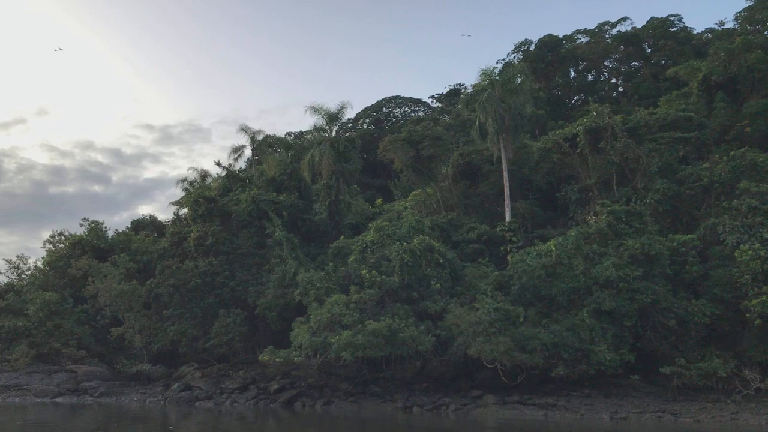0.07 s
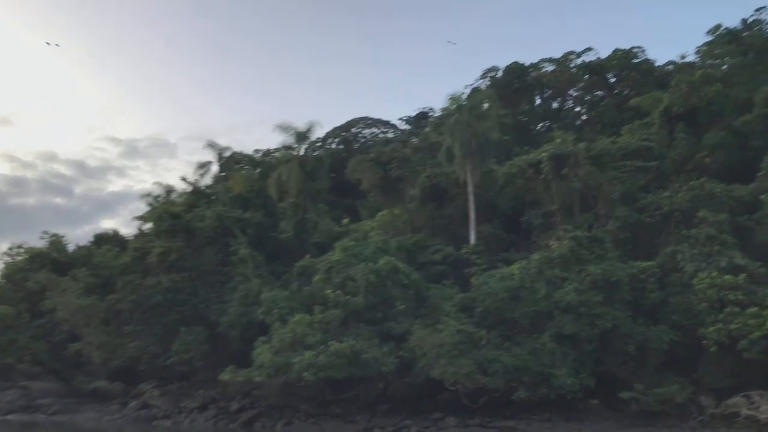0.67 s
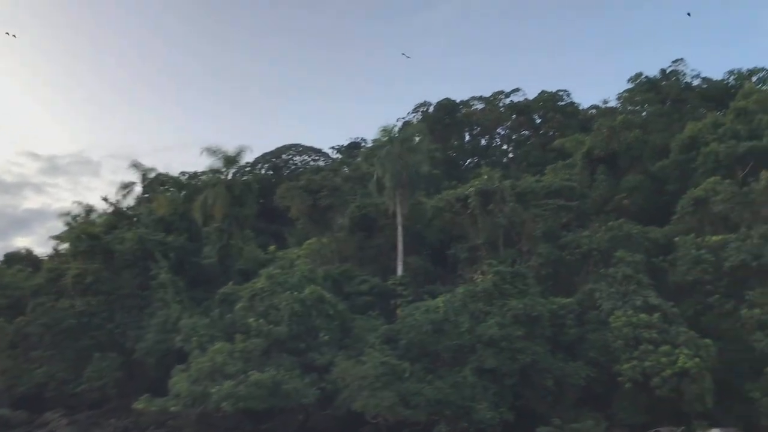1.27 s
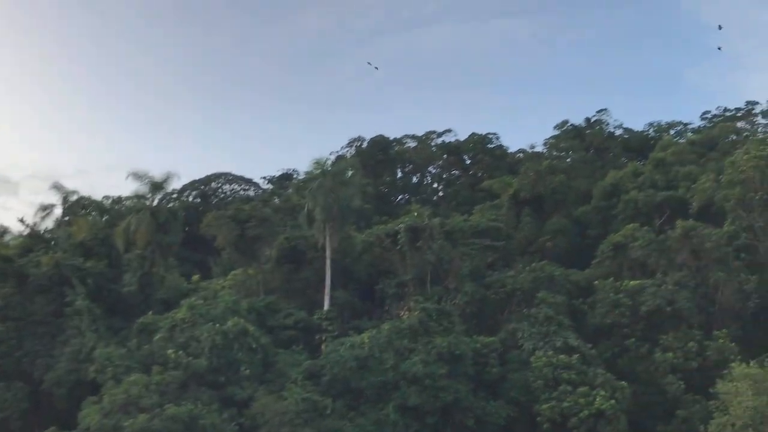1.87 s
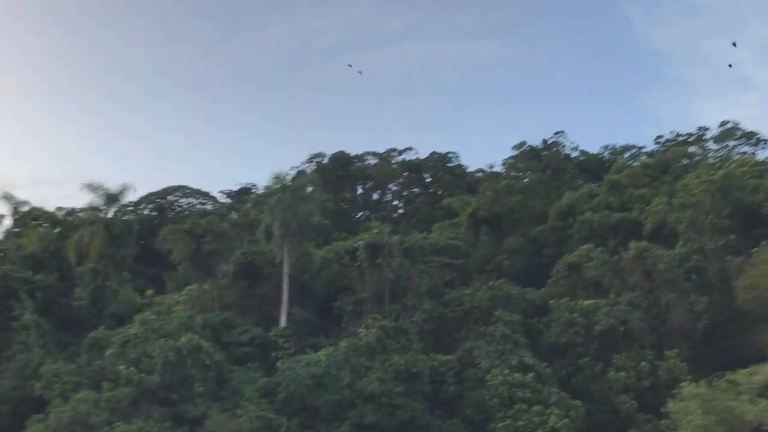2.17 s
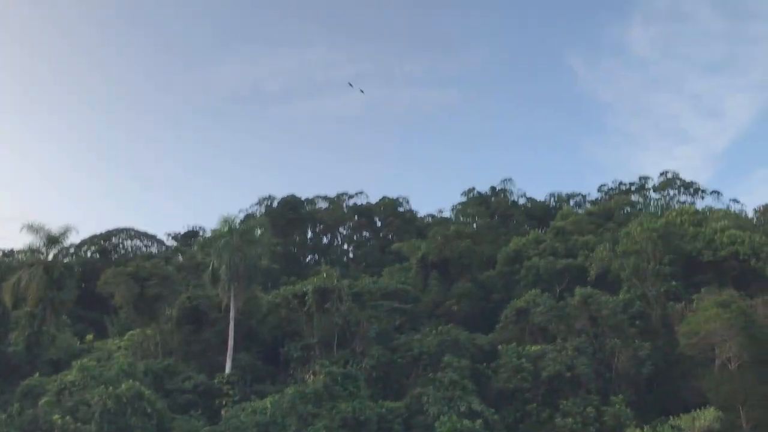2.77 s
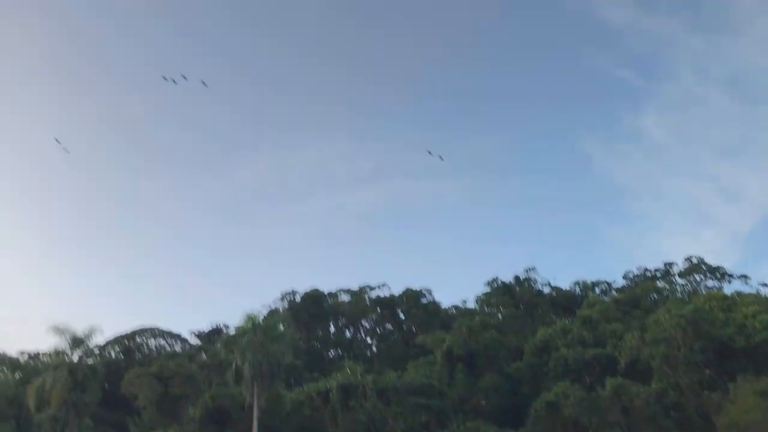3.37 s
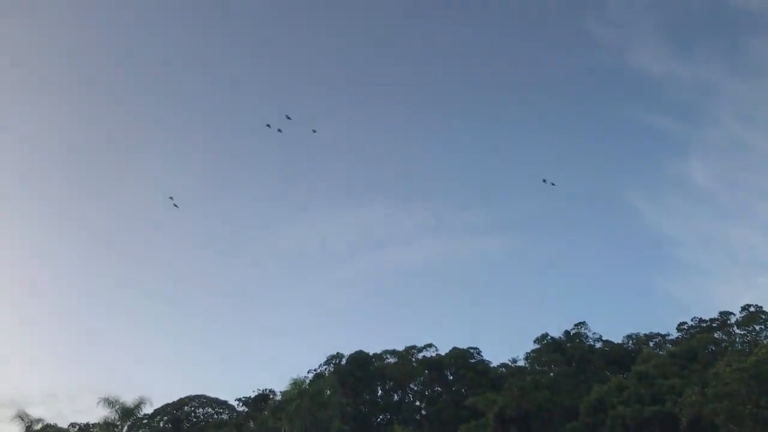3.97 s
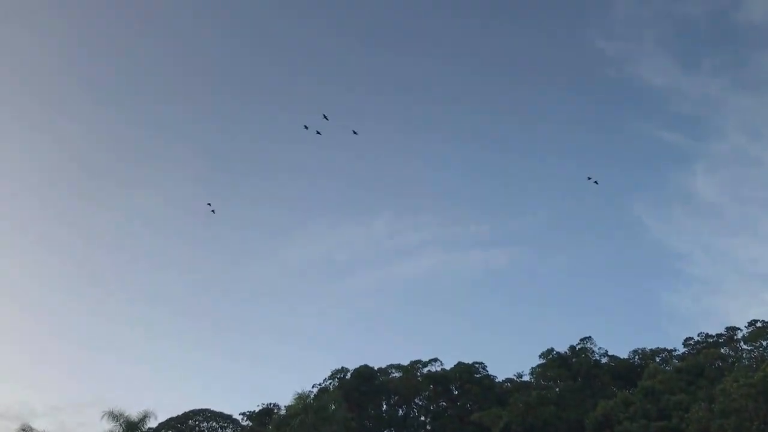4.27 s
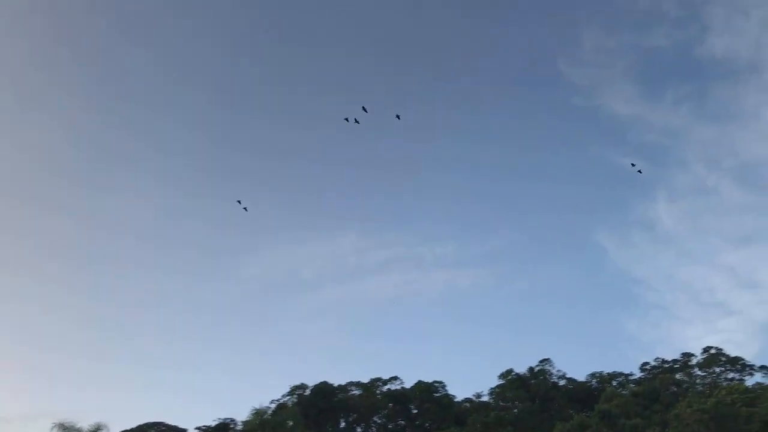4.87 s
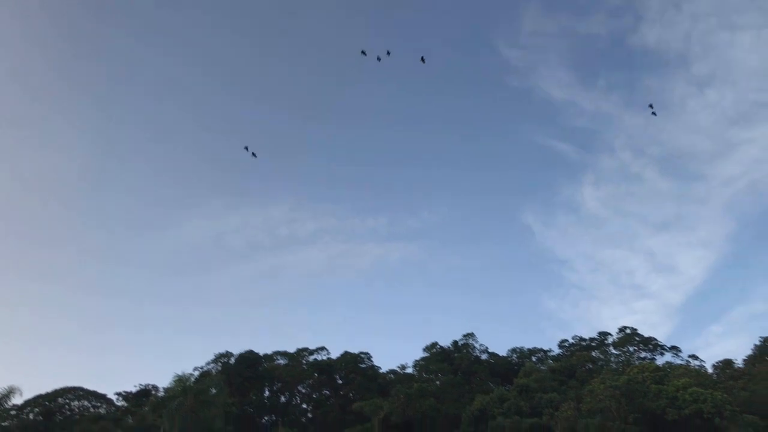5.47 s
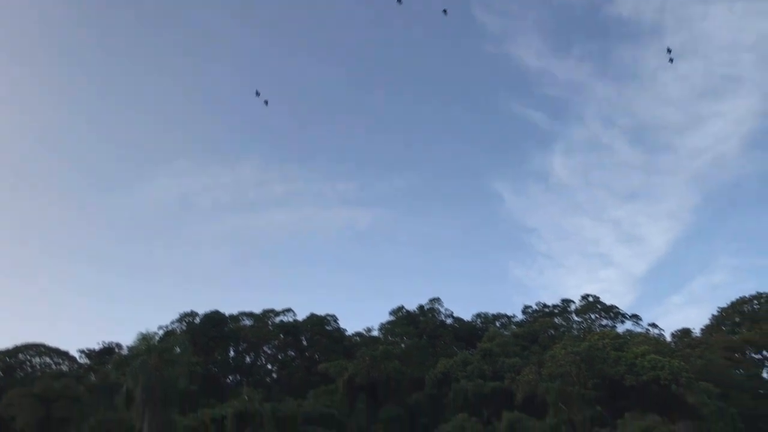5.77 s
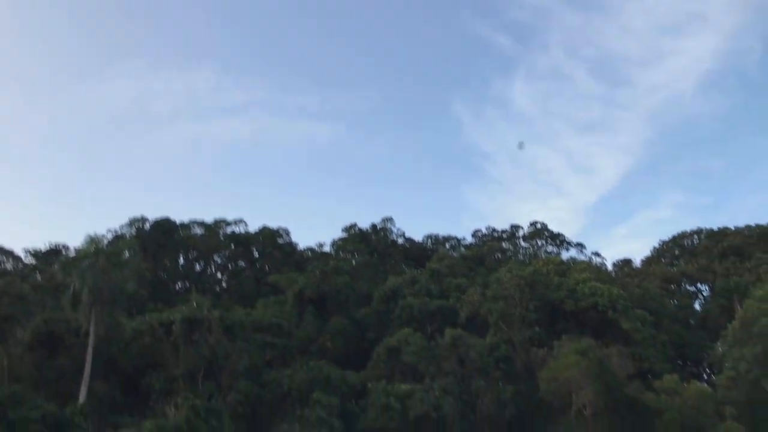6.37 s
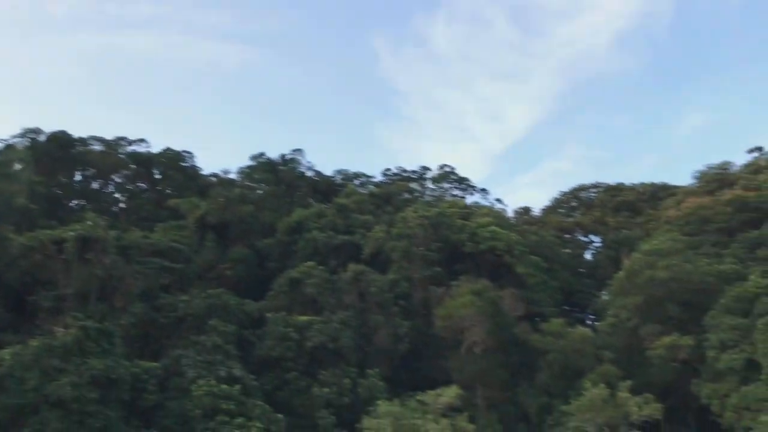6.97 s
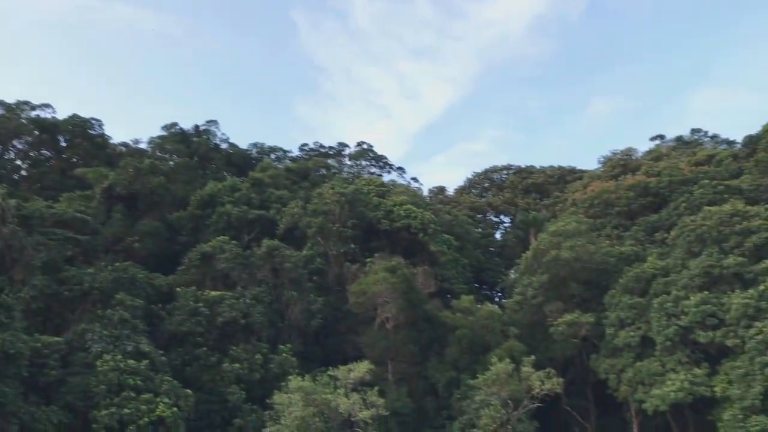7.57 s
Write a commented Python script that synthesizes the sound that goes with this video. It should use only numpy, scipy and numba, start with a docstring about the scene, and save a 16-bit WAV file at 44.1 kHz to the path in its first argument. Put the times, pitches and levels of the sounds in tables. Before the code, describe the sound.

Parrots fly overhead with short screeches, yelps and rattling squawks, over a distant chattering flock and a faint engine hum.

```python
"""A forested shore, where pairs of parrots fly over with shrill held screeches, hoarse rising yelps
and harsh rattling squawks. A bird's voice box holds a tone for a screech or yelp and fires quick bursts
for a squawk. Screeches and yelps brighten as the birds come overhead, and the wooded hillside throws the
calls back. A big flock chatters far off in the trees, and a distant boat engine hums under it all."""
import sys
import numpy as np
from scipy import signal
from scipy.fft import rfft, irfft, next_fast_len
from scipy.io import wavfile
from scipy.ndimage import uniform_filter1d
from numba import njit

SR = 44100
rng = np.random.default_rng(int(sys.argv[2]) if len(sys.argv) > 2 else 0)


def materialize(psi):
    """Save the field psi as 16-bit PCM at rate SR to the path in sys.argv[1].

    A 1-D psi becomes a single channel; in a 2-D psi each row is a channel.
    """
    bounded = np.clip(np.atleast_2d(psi).T, -1, 1)
    quanta = np.round(bounded * 32767).astype(np.int16)
    wavfile.write(sys.argv[1], SR, quanta)


N = 335601
TIME = np.arange(N) / SR

# The tones of the boat engine. Each row: pitch in Hz, level in dB before it swells and fades.
ENGINE_TONES = [(31, -73), (62, -62), (92.6, -61), (124, -75)]
# The tone of the low rumble. Each row: frequency in Hz, relative level in dB.
RUMBLE_SPECTRUM = [(15, -53), (28, -12), (50, 0.5), (75, -2), (120, -5), (200, -10), (350, -17), (600, -24)]
# The tone of the far flock and the shore air. Each row: frequency in Hz, relative level in dB.
FLOCK_SPECTRUM = [(240, -27), (400, -27.5), (750, -14), (1000, -7.5), (1400, -4.5), (1800, 0), (2050, -0.5),
                  (2400, -8), (4100, -8), (4800, -15), (6400, -21), (7500, -35.5), (8500, -31),
                  (10000, -43), (15500, -36.5)]
# How the far flock grows louder and softer. Each row: time in seconds, relative level in dB.
FLOCK_LOUDNESS = [(0.3, -47), (3.73, -48), (4.25, -44.5), (5.93, -48), (6.82, -45), (7.06, -49.5),
                  (7.5, -43.5)]
# Where a throat and open beak ring. Each row: frequency in Hz, width in Hz, relative level in dB.
THROAT_RESONANCES = [(1650, 1000, 1), (2980, 680, 6.5), (4250, 700, -.5), (6050, 1100, -8),
                     (7400, 600, -17), (8600, 900, -18), (9700, 800, -20), (12300, 2000, -22)]
# The squawks. Each row: start in seconds, length in seconds, level in dB, brightness in dB per octave.
SQUAWK_CALLS = [ (1.554, 0.065, -41.5, 1), (2.005, 0.1, -42, 2), (2.808, .15, -45, -1.5),
                (3.048, .13, -43, 0), (3.28, 0.17, -42, -2), (3.608, .15, -42.5, -0.5),
                (4.34, 0.055, -40, -1), (4.534, .046, -44, -1.5), (4.774, 0.048, -41.5, 0.5),
                (4.878, 0.043, -40, 0), (5.274, .138, -34.5, 1.5), (5.85, .022, -40, -0.5),
                (6.188, 0.049, -38.5, -4.5), (6.623, 0.13, -33.5, 3.5), (7.36, 0.17, -43.5, 2.5), ]
# The yelps. Each row: start in seconds, length in seconds, first and last pitch in Hz,
# relative level in dB.
YELP_CALLS = [ (1.477, 0.041, 1955, 1990, -48), (2.311, 0.049, 1985, 2105, -43.5),
              (2.406, 0.047, 1360, 1475, -47), (2.477, 0.095, 1760, 1910, -42.5),
              (2.698, 0.066, 1990, 2156, -44.5), (2.878, 0.079, 1790, 1900, -44.5),
              (3.188, 0.11, 1686, 1847, -45), (3.471, 0.041, 2008, 2080, -47.5),
              (3.699, .026, 1970, 2103, -40), (5.822, .035, 1560, 2040, -43),
              (6.195, .055, 1730, 2356, -37.5), (7.133, 0.051, 1840, 1890, -45),
              (7.381, 0.083, 1925, 2050, -42), ]
# Harmonics are tones at 1, 2, 3, .. times the pitch. These are the base levels in dB from the third up.
UPPER_HARMONICS_DB = [-11, -17, -26, -26.5, -31]
# The screeches. Each row: start in seconds, length in seconds, held pitch in Hz, sag as a share of
# that pitch, relative level in dB, edge (how far the second harmonic tops the first) in dB.
SCREECH_CALLS = [ (0.057, 0.029, 1967, 0, -43.5, -4), (0.373, .12, 2031, .01, -43.5, -8),
                 (0.579, .078, 2185, 0, -58.5, -21), (.699, 0.1, 2005, 0.027, -43, -3.5),
                 (1.099, 0.12, 2024, 0.0036, -42.5, -5), (1.226, 0.086, 2200, 0.018, -40.5, -5.5),
                 (1.589, 0.13, 2120, 0, -41, -6.5), (2.52, 0.082, 2170, 0, -49.5, -20),
                 (3.296, .081, 2120, 0.013, -46.5, -14), (3.998, 0.13, 2106, 0, -41.5, 4),
                 (4.396, 0.13, 2086, 0.00032, -38.5, -5.5), (4.443, 0.11, 2013, 0.022, -41.5, -2.5),
                 (4.58, 0.1, 2106, 0.0059, -40.5, -4.5), (4.681, 0.056, 1602, 0.0067, -50, -13),
                 (4.839, 0.12, 2035, 0.00075, -42, -7.5), (4.918, 0.1133, 2178, 0.041, -35, -5.5),
                 (5.869, 0.12, 2110, 0.034, -39.5, 4.5), (5.897, 0.093, 1792, 0.0087, -53.5, -17),
                 (6.139, 0.15, 2115, 0.018, -38, -6), (6.251, 0.11, 2117, 0.0015, -41, 6),
                 (7.141, 0.13, 1751, 0, -47.5, 10.5), (7.5, 0.12, 1865, .01, -44, -7), ]


def undb(db):
    """Turn decibels into a number to multiply by."""
    return 10 ** (np.asarray(db) / 20)


def level(x, db):
    """Scale a sound to an average (rms) level in dB."""
    return x * undb(db) / np.sqrt(np.mean(x ** 2) + 1e-20)


def add(track, start_s, x):
    """Mix a sound into the track at its start time."""
    i = max(int(start_s * SR), 0)
    track[i:i + len(x)] += x[:max(N - i, 0)]


def wander(rate_hz, size):
    """A smooth random wobble, roughly between -1 and 1."""
    k = max(int(SR / rate_hz), 2)
    steps = np.repeat(rng.standard_normal(size // k + 3), k)
    return np.sqrt(2) * uniform_filter1d(uniform_filter1d(steps, k), k)[k:k + size]


def colour(x, points):
    """Shape bass and treble along a curve of (Hz, dB) points."""
    hz, db = np.transpose(points)
    size = next_fast_len(len(x))
    freqs = np.maximum(np.fft.rfftfreq(size, 1 / SR), 1)
    gain = undb(np.interp(np.log(freqs), np.log(hz), db))
    return irfft(rfft(x, size) * gain, size)[:len(x)]


@njit
def band_pass(x, hz, width):
    """Keep only the sound near a frequency, which may move every sample."""
    y, band, low = np.empty(len(x)), 0., 0.
    for i in range(len(x)):
        tuning, damping = np.tan(np.pi * hz[i] / SR), width / hz[i]
        ring = (band + tuning * (x[i] - low)) / (1 + tuning * (tuning + damping))
        band, low = 2 * ring - band, low + 2 * tuning * ring
        y[i] = damping * ring
    return y


def resonate(x, hz, width):
    """Make a sound ring near one frequency, filtering twice for a cleaner cut."""
    hz = np.minimum(hz, SR / 2 - 1000) * np.ones(len(x))
    width = float(width / np.sinc(2 * hz[-1] / SR))  # stops the band narrowing in the treble
    return band_pass(band_pass(x, hz, width), hz, width)


def fade(t, length, rise_s, fall_s):
    """Fade a call in, then out once its length is up."""
    return np.clip(t / rise_s, 0, 1) * np.clip((length - t) / fall_s + 1, 0, 1)


def boat(fade_db_per_s=0.79, swell_period_s=1.43, surge_at_s=.25, surge_width_s=0.11):
    """Only the lowest engine tones cross the water, fading as the boat draws off, above a rumble."""
    drifting_time = TIME + np.cumsum(0.0054 * wander(5.1, N)) / SR
    hum = sum(undb(db) * np.sin(2 * np.pi * (hz * drifting_time + rng.random()))
              for hz, db in ENGINE_TONES)
    swell_db = 2 * np.cos(2 * np.pi * (TIME - 3.8) / swell_period_s)
    hum_db = 4 - fade_db_per_s * TIME + swell_db
    rumble = level(colour(rng.standard_normal(N), RUMBLE_SPECTRUM + [(3000, -57)]), db=-60.5)
    surge_db = 9.5 * np.exp(-((TIME - surge_at_s) / surge_width_s) ** 2)  # the rumble wells up once
    return np.sqrt(2) * hum * undb(hum_db) + rumble * undb(surge_db)


def flock(flicker_db=2.5):
    """Hundreds of far voices merge into a wash of noise whose bands come and go on their own."""
    wash = sum(resonate(rng.standard_normal(N), hz, hz / 3) * undb(flicker_db * wander(16, N))
               for hz in np.geomspace(350, 16000, 20))
    wash = level(colour(wash, FLOCK_SPECTRUM), db=5.5)
    times, loudness_db = np.transpose(FLOCK_LOUDNESS)
    return wash * undb(np.interp(TIME, times, loudness_db))


def forest_echo(x, trees_delay_s=0.042, hillside_decay_s=1):
    """The nearest trees scatter a quick echo, and the hillside adds a longer one."""
    t = np.arange(SR) / SR
    trees = rng.standard_normal(SR) * (t / trees_delay_s) ** 2 * np.exp(-2 * t / trees_delay_s)
    hillside = rng.standard_normal(SR) * np.minimum(t / 0.022, 1) * undb(-60 * t / hillside_decay_s)
    echo = (level(trees, db=-10.5) + level(hillside, db=-13)) / np.sqrt(SR)
    echo = colour(echo, [(2000, -0.5), (4500, 3.5), (9000, -1.5), (15000, -5)])
    return signal.fftconvolve(x, echo)[:N]


def far_calls(count=190, spread_db=7):
    """Single birds stand out of the far flock, dulled by distance and blurred by the trees."""
    calls = np.zeros(N)
    for k, (when, span, pitch, bend, loud) in enumerate(rng.random((count, 5))):
        hz = 1050 + 1100 * pitch
        length = .025 + .05 * span
        if k % 2:  # every other call is a rasp
            call = undb(-3) * squawk(length, rattle_hz=100, buzz_hz=250, bright_db=-12)
        else:
            open_hz, close_hz = hz * (.88 + .24 * bend), hz * (1.05 - 0.1021 * bend)
            call = cry(length, open_hz, hz, close_hz, edge_db=-8, bright_db=-0.78, quaver=0.013)
        gain = hz ** 2 * undb(spread_db * loud)  # higher cries are louder
        add(calls, (k + when) / count * N / SR, gain * call)
    return level(1.13 * calls + forest_echo(calls), db=-46)


def air_loss_db(time_s, overhead_s=5.2, speed_m_s=10, height_m=48, db_per_m=0.28):
    """How much brightness the air takes from a call, compared with one from straight overhead."""
    distance_m = np.hypot(speed_m_s * (time_s - overhead_s), height_m)
    return db_per_m * (distance_m - height_m)


def squawk(length, rattle_hz, buzz_hz, bright_db, burst_s=.007, swell_db=5, crackle_db=2):
    """The voice box fires rough bursts that speed up into a buzz and ring the throat as the beak opens."""
    t = np.arange(int((length + .02) * SR)) / SR
    n = len(t)
    bursts_per_s = rattle_hz + (buzz_hz - rattle_hz) * np.clip(t / length * 2, 0, 1) ** 4
    burst_count = np.cumsum(bursts_per_s * np.exp(.05 * wander(150, n))) / SR
    triggers = np.diff(np.floor(burst_count), prepend=-1)
    burst = rng.standard_normal(n) * np.exp(-(t / burst_s) ** 2)
    rattle = level(signal.fftconvolve(triggers, burst)[:n], db=0)  # one burst, repeated
    rasp = np.tanh(2 * rattle)  # the membranes can only swing so far
    rasp *= undb(crackle_db * wander(400, n))
    beak = 1 - 0.22 * np.exp(-(t / (0.45 * length)) ** 2)  # the ringing rises as the beak opens
    tuning = 1 + .025 * rng.uniform(-1, 1)  # birds differ in size
    voice = sum(undb(db) * resonate(rasp, hz * tuning * beak, width) * (-1) ** k
                for k, (hz, width, db) in enumerate(THROAT_RESONANCES))
    voice = colour(voice, [(hz, bright_db * np.log2(hz)) for hz in (1000, 16000)])
    swell = undb(swell_db * np.sin(np.pi * t / t[-1]))
    return level(voice * swell * fade(t, length, rise_s=.002, fall_s=.02), db=0)


def cry(length, open_hz, held_hz, close_hz, edge_db, bright_db, quaver, settle_s=0.01462, fall_s=.012):
    """A screech or yelp: the voice box settles on a wavering note and slides to its closing pitch."""
    t = np.arange(int((length + fall_s) * SR)) / SR
    n = len(t)
    slide_hz = held_hz + (close_hz - held_hz) * t / length
    hz = slide_hz + (open_hz - held_hz) * np.exp(-(t / settle_s) ** 2)
    jitter = .0065 + 0.53 * quaver  # both are shares of the pitch; more quaver is also hoarser
    hz *= 1 + quaver * wander(109, n) + jitter * wander(1300, n)
    phase = 2 * np.pi * np.cumsum(hz) / SR
    harmonics_db = [-edge_db / 2, edge_db / 2]
    harmonics_db += [db + bright_db * min(k, 3) for k, db in enumerate(UPPER_HARMONICS_DB, 1)]
    voice = sum(undb(db + 2.5 * wander(130, n)) * np.sin(k * phase)  # each harmonic flutters
                for k, db in enumerate(harmonics_db, 1))
    shimmer = undb(1.74 * wander(300, n))
    return voice * shimmer * fade(t, length, rise_s=0.0057, fall_s=fall_s)


def parrots():
    """The passing birds screech, yelp and squawk; their small beaks give off almost no bass."""
    calls = np.zeros(N)
    for start, length, hz, sag, db, edge_db in SCREECH_CALLS:
        open_hz, close_hz = hz * 1.0495, hz * (1 - sag)
        bright_db = 0.67 + 0.21 * edge_db - air_loss_db(start)
        screech = cry(length, open_hz, hz, close_hz, edge_db, bright_db, quaver=0.0053)
        add(calls, start, np.sqrt(2) * undb(db) * screech)
    for start, length, first_hz, last_hz, db in YELP_CALLS:
        bright_db = -.5 - air_loss_db(start)
        yelp = cry(length, first_hz, first_hz, last_hz, edge_db=-7.5, bright_db=bright_db, quaver=0.0179)
        add(calls, start, np.sqrt(2) * undb(db) * yelp)
    for start, length, db, bright_db in SQUAWK_CALLS:
        add(calls, start, undb(db) * squawk(length, rattle_hz=50.05, buzz_hz=280.6, bright_db=bright_db))
    return colour(calls, [(400, -24), (1100, 0), (16000, 0)])


def scene():
    """Mix the parrots, their echo, the far birds and the boat into one channel."""
    birds = parrots()
    return (birds + forest_echo(birds) + far_calls() + flock() + boat())[None]


def record(dry, silence_s=.06, top_hz=15700):
    """The sound sets in after a moment of silence and loses its highest treble."""
    fade_in = np.clip((TIME - silence_s) / .005, 0, 1)
    treble_cut = signal.ellip(10, .2, 70, top_hz, fs=SR, output="sos")
    return signal.sosfilt(treble_cut, dry * fade_in)


dry = scene()
out = record(dry)
materialize(out)
```